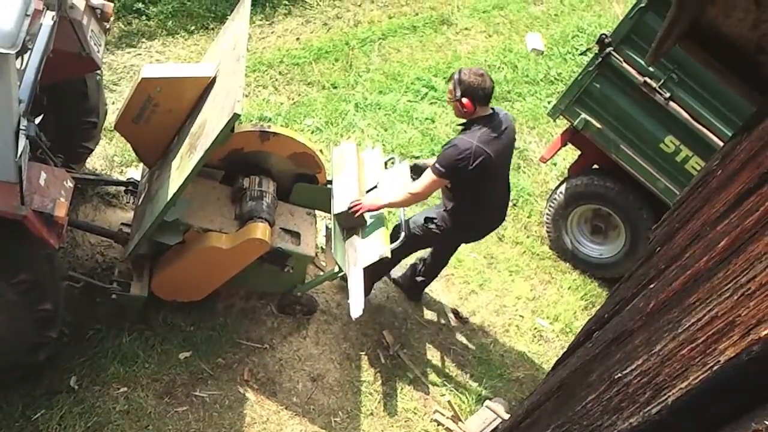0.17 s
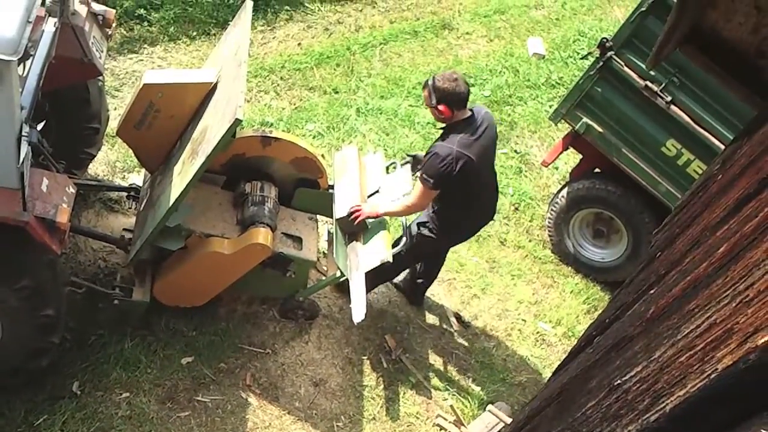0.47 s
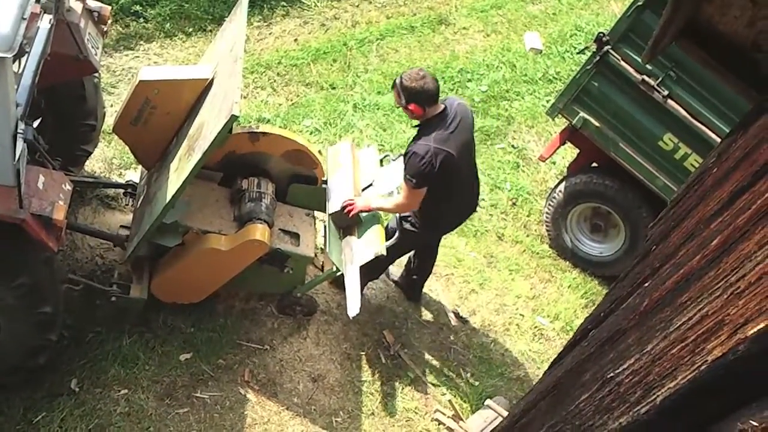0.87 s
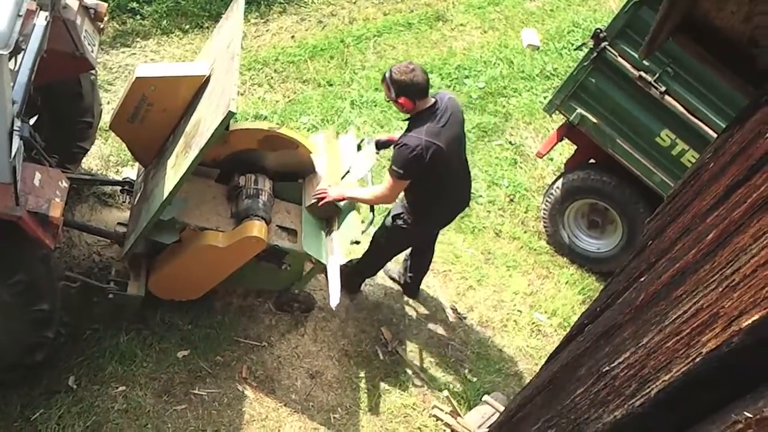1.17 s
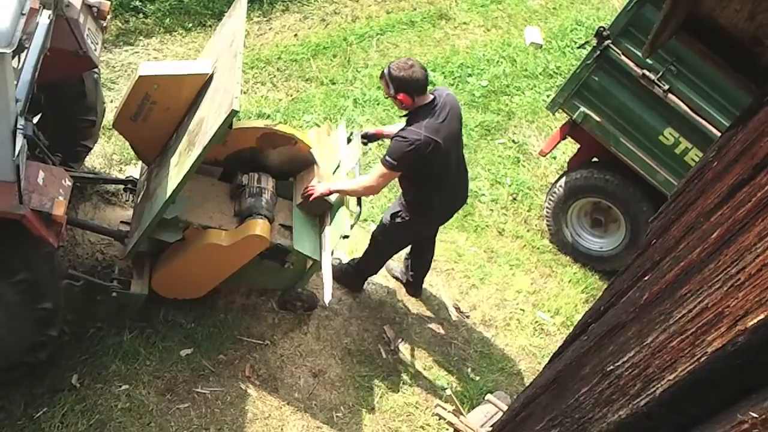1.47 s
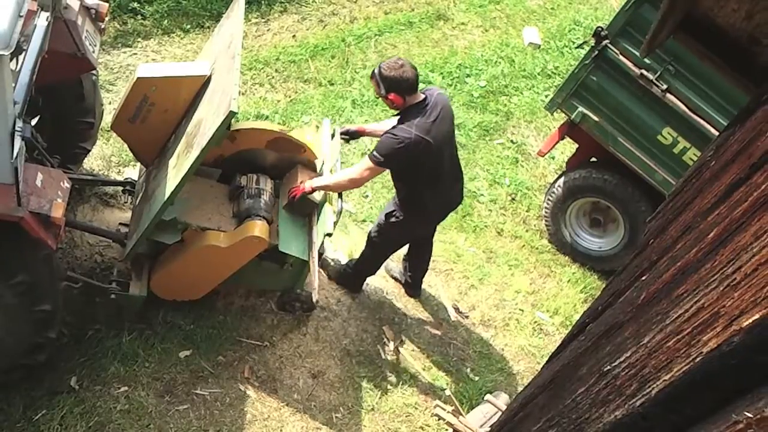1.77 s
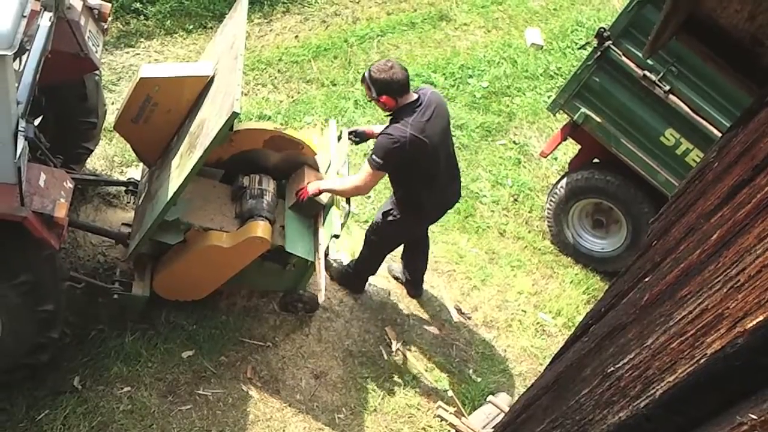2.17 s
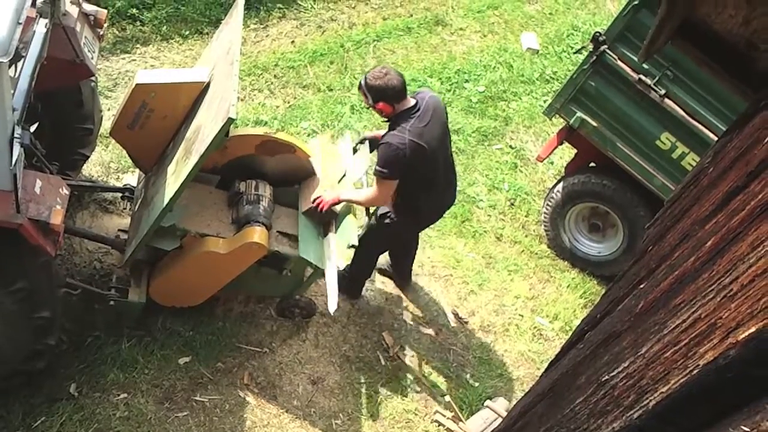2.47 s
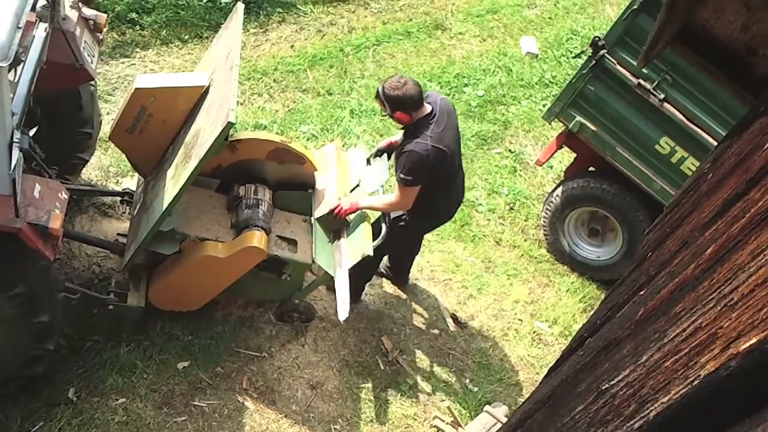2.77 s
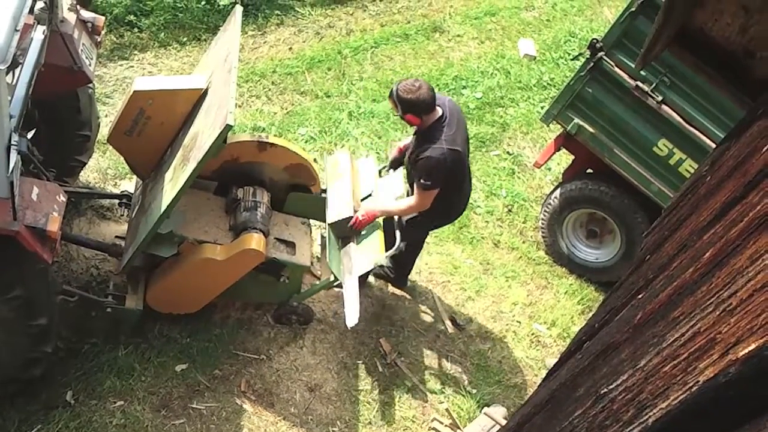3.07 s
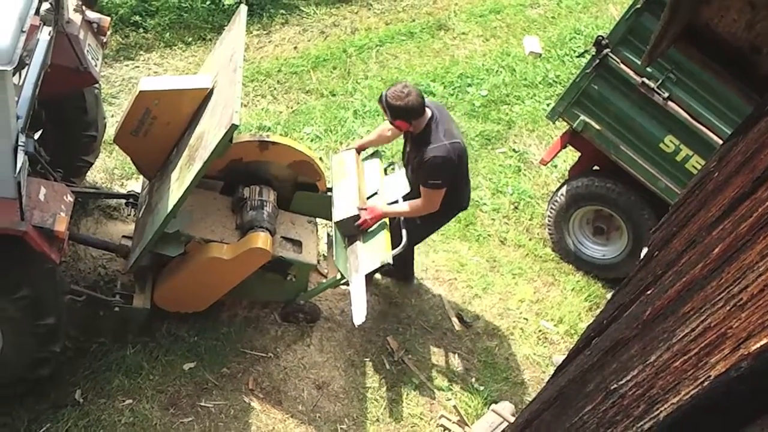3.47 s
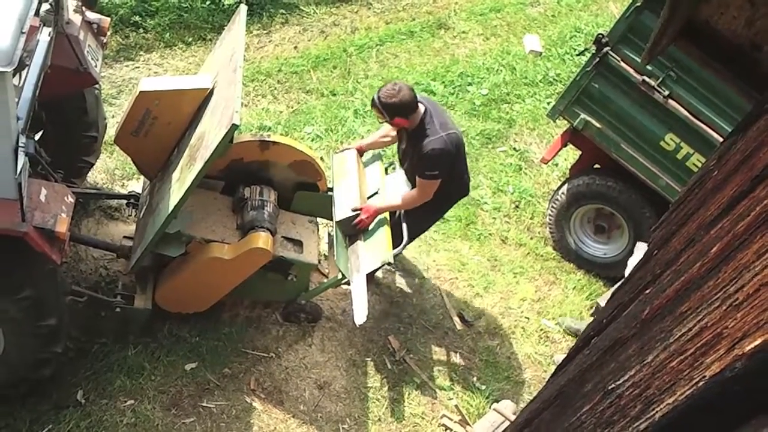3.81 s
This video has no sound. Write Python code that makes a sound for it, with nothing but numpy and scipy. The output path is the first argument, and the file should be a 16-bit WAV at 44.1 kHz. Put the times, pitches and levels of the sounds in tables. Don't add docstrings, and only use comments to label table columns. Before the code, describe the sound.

A tractor-powered circular saw whirs over a low diesel throb throughout, outdoors in mono. Wood clacks on steel from 0 to 1 s. At 1.1 s a screaming, tearing cut bursts in, lasting until about 1.8 s while engine and blade sag; a piece thuds. Speed recovers; a weaker bite at 2.45 s scrapes and sings until 2.9 s. Hollow log knocks and rolling clatter follow from 3.1 s, thinning towards 3.9 s.

```python
import sys
import numpy as np
from scipy import signal
from scipy.fft import rfft, irfft, next_fast_len
from scipy.io import wavfile
from scipy.ndimage import uniform_filter1d, map_coordinates

SR = 44100
rng = np.random.default_rng(int(sys.argv[2]) if len(sys.argv) > 2 else 0)


def transcribe(signal):
    frames = np.atleast_2d(signal).T
    limited = np.clip(frames, -1, 1)
    pcm = np.round(limited * 32767).astype(np.int16)
    wavfile.write(sys.argv[1], SR, pcm)


def to_linear_factor(level_db):
    exponent = np.asarray(level_db, float) / 20
    return 10 ** exponent


N = 173754

# time_s, cycle_rate_hz
ENGINE_SPEED = [(0, 20.05), (1.08, 20.05), (1.4, 18.6), (1.8, 16.1), (1.93, 16.6), (2.14, 17.75),
                (2.36, 18.75), (2.55, 19.1), (2.98, 19.7), (3.5, 20.03), (3.94, 20.05)]
# cycle_multiple, free_level_db, load_gain_db_per_hz_lost
ENGINE_ORDERS = [(1, -44, -18), (2, -38.5, 5.5), (3, -31.5, 2), (4, -24, 0.5), (5, -19.5, 0), (6, -35.5, 4),
                 (7, -41, 4.5), (8, -48, 4.5), (9, -43.5, -1), (11, -41.5, 0.5)]
# freq_hz, density_db
ROAR_SPECTRUM = [(4, -13), (25, -8.5), (60, -8), (150, -7), (200, -7.5), (305, -15), (385, -9),
                 (669, -12.5), (1000, -15.5), (1400, -37), (2200, -120)]
# freq_hz, density_db
WHIR_SPECTRUM = [(470, -60.5), (800, -24), (889, -12.5), (1570, -2), (1960, -14.5), (2110, -11.5),
                 (3100, -26.5), (6950, -73), (7950, -41.5), (10300, -85.5), (17500, -120)]
# time_s, speed_share_of_free, whir_gain_db
BLADE_SPEED = [(0, 0.93, 0.5), (.5, 0.97, -1), (1.08, 0.95, -0.5), (1.8, .8, 2.5), (2.0, 0.83, -1.5),
               (2.2, .83, -4), (2.4, 0.92, -0.5), (2.62, 0.95, -2), (2.75, .93, 0), (3.0, 0.98, 1),
               (3.3, 0.95, 0.5), (3.94, 0.95, -1)]
# freq_hz, width_hz, lift_ratio
HOOD_MODES = [(1208, 68, 0.79), (1452, 90, .5), (1630, 77, 0.36), (2070, 120, 0.77)]
# start_s, peak_db, snap_over_clack_db
KNOCKS = [(0.05, -18.5, -7.5), (0.117, -10.5, -15), (0.201, -11.5, -18), (0.248, -20.5, -14),
          (0.329, -12, -15), (0.375, -22.5, -10), (0.421, -19, -3), (0.4987, -15.5, -14), (0.659, -31, -13),
          (0.7626, -22.5, -4), (0.801, -24, -3), (0.9525, -22, -4), (1.86, -7.5, -15), (1.924, -7, -14.5),
          (2.03, -18.5, -4.5), (2.2124, -18.5, -6.5), (2.2584, -19.5, -7), (2.814, -10.5, -1),
          (2.945, -15, -31), (3.1148, -13, -6.5), (3.16, -7, -9.5), (3.206, -11, -4), (3.2586, -11.5, -11),
          (3.3094, -19, -14.5), (3.3544, -9.5, -7.5), (3.455, -16.5, -13.5), (3.565, -11, -12.5),
          (3.684, -11.5, -14.5), (3.738, -20.5, -6.5), (3.781, -16.5, -21)]
# freq_hz, density_db
CLACK_SPECTRUM = [(1000, -13), (1800, 11), (2600, 0.5), (4000, -9), (6500, -15.5), (8000, -40.5)]
# start_s, level_db, t60_s
DROPS = [
    (1.58, -5.5, 0.88),
    (1.929, -17.5, 0.12),
    (1.99, -22, 0.36),
    (3.118, -14.5, 0.26),
    (3.167, -13.5, 0.36),
    (3.251, -24, 0.58),
    (3.341, -19, 0.32),
    (3.43, -23, 0.42),
    (3.868, -21.5, 0.36),
]
# freq_hz, width_hz, level_db
THUD_MODES = [(190, 40, 0), (232, 45, 0), (385, 90, 1), (470, 70, -2), (690, 90, -5), (900, 150, -8)]
# start_s, pitch_hz, level_db, length_s
SINGING = [(0.429, 2070, -23, 0.082), (1.078, 2200, -9, 0.032), (1.189, 1935, -2.5, 0.1),
           (1.26, 1822, -5.5, 0.087), (1.586, 4540, -6.5, 0.031), (1.601, 2562, -9.5, 0.065),
           (1.7, 3850, -11, 0.033), (1.688, 2740, -12, .05), (1.762, 1700, -14.5, .04),
           (1.745, 1983, -9, 0.058), (1.789, 2008, -18, 0.098), (1.8, 2070, -11.5, .04),
           (1.851, 2305, -20, 0.025), (1.92, 1545, -22.5, 0.036), (1.92, 1194, -23.5, 0.061),
           (2.327, 1692, -26.5, .26), (2.438, 6270, -35, .046), (2.44, 4230, -24.5, .035),
           (2.44, 3580, -25, 0.044), (2.482, 1260, -19.5, 0.13), (2.494, 2540, -25.5, .3),
           (2.504, 3970, -28.5, 0.074), (2.557, 4140, -25, 0.041), (2.57, 2805, -30, 0.046),
           (2.598, 2320, -28, .15), (2.63, 4540, -34.5, 0.061), (2.697, 1970, -18, 0.18),
           (2.68, 1880, -26, 0.13), (2.698, 1420, -16.5, 0.052), (2.726, 1358, -21.5, .15),
           (2.728, 2620, -29, 0.23), (2.746, 2240, -26.5, 0.14), (2.764, 2110, -27, .1),
           (2.813, 6010, -30.5, .03), (2.87, 1480, -23, .12), (3.555, 2090, -24, .033)]
# time_s, force_db
DEEP_CUT = [
    (1.068, -44),
    (1.073, -15),
    (1.11, 5.5),
    (1.45, 4.5),
    (1.6, 4.5),
    (1.765, -1.5),
    (1.815, -13.5),
    (1.842, -18.5),
    (1.97, -40.5),
]
# time_s, force_db
LIGHT_CUT = [
    (2.2, -43.5),
    (2.36, -35),
    (2.385, -22),
    (2.435, -31.5),
    (2.445, -9),
    (2.5, -21),
    (2.69, -16.5),
    (2.8, -24),
    (2.9, -43),
]
# freq_hz, density_db
TEARING_SPECTRUM = [(4, -6), (100, -10.5), (200, -9), (825, -8), (1310, -5), (1900, -6.5), (4290, -6),
                    (6710, -9.5), (7950, -17.5), (10300, -47.5)]
# freq_hz, level_db, t60_s
BLADE_MODES = [(1180, -12, .12), (1696, -6, .3), (1825, -6, .3), (1916, -9, .2), (2245, -8, .25),
               (2342, -9, .3), (2546, -4, .3), (2790, -7, .2), (3521, -8, .3), (3860, -8.5, .25),
               (4230, -6, .25), (4545, -7, .25), (4883, -9, .3), (5590, -9, .3)]
# time_s, gain_db
CAMERA_GAIN = [
    (1.072, 0),
    (1.11, -19.5),
    (1.6, -17.5),
    (1.765, -10),
    (1.815, -4),
    (1.93, 1),
    (2.43, 1),
    (2.455, -6),
    (2.5, 0.5),
    (3.94, 0),
]
# start_s, pitch_hz, level_db, t60_s
STRUCK_NOTES = [(3.116, 6730, -13.5, 0.06), (3.12, 6200, -19, .06), (3.113, 474, -16.5, .2),
                (3.127, 216, -16, 0.36), (3.165, 198, -20.5, .4), (3.168, 397.4, -18, 0.21),
                (3.17, 472, -19, .3), (3.185, 694, -18, .4), (3.22, 364, -20.5, .4),
                (3.269, 235, -16.5, 0.21), (3.28, 465, -20.5, .5), (3.29, 683.5, -22.5, 0.61),
                (3.335, 377, -21, .3), (3.361, 240.5, -20, 0.46)]

BURST_S = np.arange(SR // 2) / SR


def unit(x):
    return x / np.sqrt(np.mean(x ** 2) + 1e-20)


def curve(rows, axis=1):
    cols = np.transpose(rows)
    return np.interp(np.arange(N) / SR, cols[0], cols[axis])


def wobble(rate_hz):
    knots = rng.standard_normal(int(N * rate_hz / SR) + 4)
    return map_coordinates(knots, [np.arange(N) * rate_hz / SR])


def filtered(x, response):
    m = next_fast_len(N + SR)
    return irfft(rfft(x, m) * response(np.fft.rfftfreq(m, 1 / SR)), m)[:N]


def peak(f, hz, width_hz):
    return 1j * f * width_hz / (hz * hz - f * f + 1j * f * width_hz)


def rush(spectrum, patchy_db):
    z = signal.stft(rng.standard_normal(N), nperseg=512)[2]
    patches = uniform_filter1d(rng.standard_normal(z.shape), 5, 0)
    patches = uniform_filter1d(patches, 7, 1)
    x = signal.istft(z * to_linear_factor(patchy_db * unit(patches)), nperseg=512)[1][:N]
    f, db = np.transpose(spectrum)
    return unit(filtered(x, lambda hz: to_linear_factor(np.interp(np.log(hz + 1), np.log(f + 1), db, -120, -120))))


def strike(track, start_s, burst):
    start = round(start_s * SR)
    track[..., start:start + len(BURST_S)] += burst


def decay(level_db, t60_s, rise_s):
    return to_linear_factor(level_db - 60 * BURST_S / t60_s) * (1 - np.exp(-BURST_S / rise_s))


def engine():
    free_hz, governor_lag_s, uneven_db = 20.05, 0.053, 1.15
    delay_rad = 1.05
    speed_hz = curve(ENGINE_SPEED)
    turn = 2 * np.pi * np.cumsum(speed_hz) / SR
    lost_hz = free_hz - curve(np.add(ENGINE_SPEED, (governor_lag_s, 0)))

    def pipe(hz):
        return 1 + 1.7 * np.abs(peak(hz, 92, 18))

    tones = np.zeros(N)
    for order, db, load_db in ENGINE_ORDERS:
        level = to_linear_factor(db + 1.0 + load_db * lost_hz + uneven_db * wobble(16))
        level = level * pipe(order * speed_hz) / pipe(order * free_hz)
        tones += level * np.sin(order * turn - delay_rad * order ** 2)
    pulse = 1 + 0.08 * np.cos(turn)
    return tones + to_linear_factor(-24.5 + 0.17 * lost_hz) * pulse * rush(ROAR_SPECTRUM, patchy_db=0.5)


def whir():
    whir_db, whir_sway_db, rattle_db, rattle_sway_db = -16, 0.6, -29.5, 2.5
    place = np.cumsum(curve(BLADE_SPEED))
    air = map_coordinates(rush(WHIR_SPECTRUM, patchy_db=1.0), [np.clip(place, 0, N - 1)])

    def hood(f):
        return 1 + sum(lift * np.abs(peak(f, hz, width_hz)) for hz, width_hz, lift in HOOD_MODES)

    air = unit(filtered(air, hood))
    air_db = whir_db + curve(BLADE_SPEED, axis=2) + whir_sway_db * wobble(5.8)
    rattle = to_linear_factor(rattle_sway_db * (wobble(30) + wobble(90))) * rush(CLACK_SPECTRUM, patchy_db=4.5)
    return to_linear_factor(air_db) * air + to_linear_factor(rattle_db) * unit(rattle)


def knocks():
    clack, snap, thud = np.zeros((3, N + SR))
    for start_s, db, snap_db in KNOCKS:
        blow = decay(db - 5, t60_s=0.23, rise_s=0.0005)
        strike(clack, start_s, blow)
        strike(snap, start_s, to_linear_factor(snap_db) * blow)
    for start_s, db, t60_s in DROPS:
        strike(thud, start_s, decay(db, t60_s, rise_s=0.0051))

    def trough(f):
        return sum((-1) ** k * to_linear_factor(db) * peak(f, hz, width_hz)
                   for k, (hz, width_hz, db) in enumerate(THUD_MODES))

    steel = clack[:N] * rush(CLACK_SPECTRUM, patchy_db=2.5)
    bright = snap[:N] * rush(TEARING_SPECTRUM, patchy_db=1.5)
    return steel + bright + thud[:N] * unit(filtered(rng.standard_normal(N), trough))


def singing():
    rise_s, t60_s = 0.0079, 0.2
    song = np.zeros(N + SR)
    flutter_db, blur_rad = 1.8 * wobble(45), 0.4 * wobble(65)
    for start_s, hz, db, length_s in SINGING:
        skip = rng.integers(N - len(BURST_S))
        piece = slice(skip, skip + len(BURST_S))
        fall_db = 60 * np.maximum(BURST_S - length_s, 0) / t60_s
        swell = np.clip(BURST_S / rise_s, 0, 1) * to_linear_factor(db + flutter_db[piece] - fall_db)
        strike(song, start_s, swell * np.sin(2 * np.pi * hz * BURST_S + blur_rad[piece]))
    return song[:N]


def rung(drive, hz, t60_s):
    width_hz = np.log(1000) / np.pi / t60_s
    shaken = filtered(drive * rng.standard_normal(N), lambda f: peak(f, hz, width_hz))
    return np.sqrt(SR / np.pi / width_hz) * shaken


def cutting():
    deep, light = to_linear_factor(curve(DEEP_CUT)), to_linear_factor(curve(LIGHT_CUT))
    spurts = to_linear_factor(0.3 * wobble(14) + 0.9 * wobble(45) + 2 * wobble(400))
    tear = (deep + light) * unit(spurts * rush(TEARING_SPECTRUM, patchy_db=0.93))
    shake = to_linear_factor(-11.5) * deep + to_linear_factor(-7.5) * light
    ring = np.zeros(N)
    for hz, db, t60_s in BLADE_MODES:
        flutter = unit(to_linear_factor(2.5 * wobble(8.92)))
        ring += rung(shake * to_linear_factor(db) * flutter, hz, t60_s)
    return tear + ring


def struck():
    notes = np.zeros(N + SR)
    for start_s, hz, db, t60_s in STRUCK_NOTES:
        strike(notes, start_s, decay(db, t60_s, rise_s=0.004) * np.sin(2 * np.pi * hz * BURST_S))
    return notes[:N]


def scene():
    return (engine() + whir() + knocks() + singing() + cutting() + struck())[None]


def top_cut(x):
    return signal.sosfilt(signal.butter(12, 8100, fs=SR, output="sos"), x)


def record(dry):
    clip_top, dc_offset, top_hz, top_order = 0.65, 0.005, 7366, 17.7
    x = dry[0] * to_linear_factor(curve(CAMERA_GAIN)) + dc_offset
    x = x / (1 + np.abs(x / clip_top) ** 8) ** (1 / 8)
    x = filtered(x, lambda f: (f < 8150) / (1 + (f / top_hz) ** (2 * top_order)))
    return top_cut(x[None])


dry = scene()
out = record(dry)
transcribe(out)
```